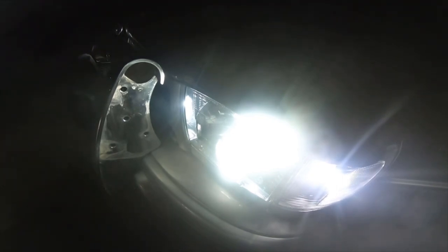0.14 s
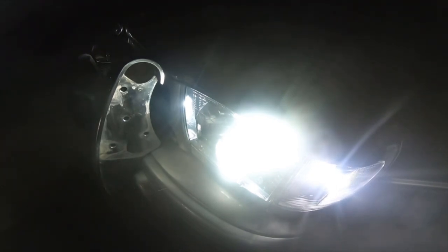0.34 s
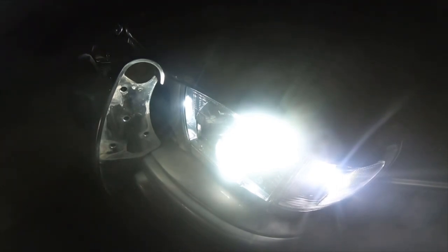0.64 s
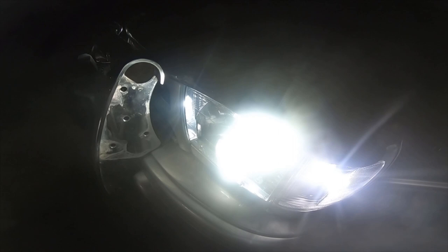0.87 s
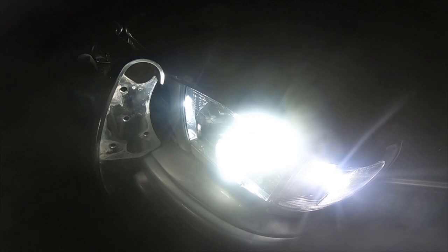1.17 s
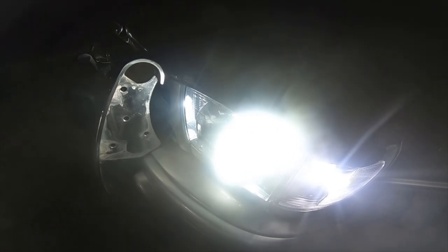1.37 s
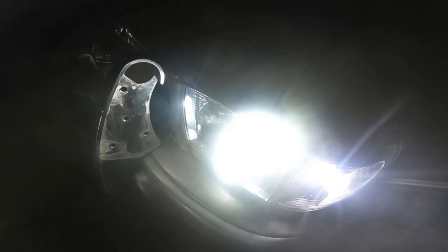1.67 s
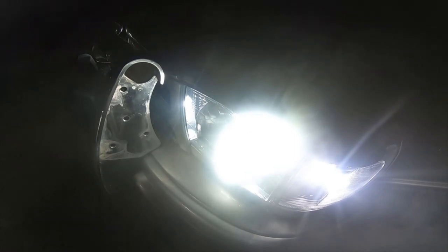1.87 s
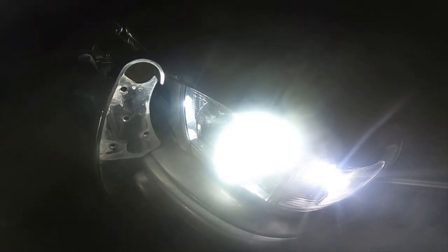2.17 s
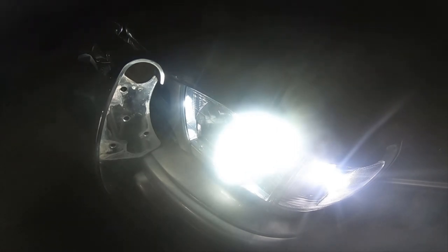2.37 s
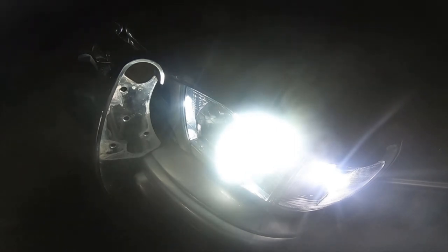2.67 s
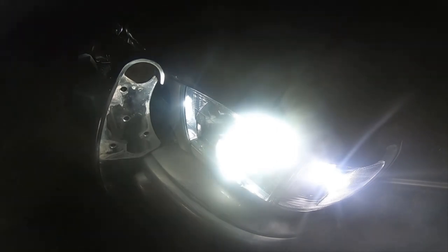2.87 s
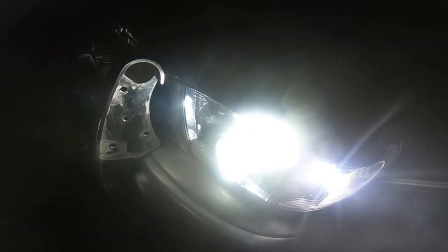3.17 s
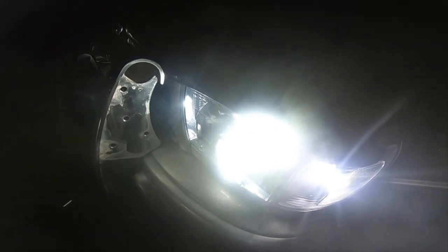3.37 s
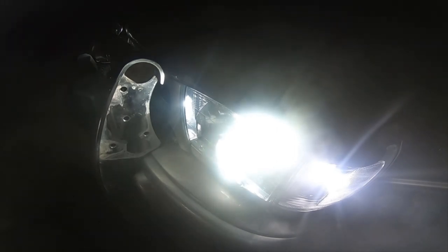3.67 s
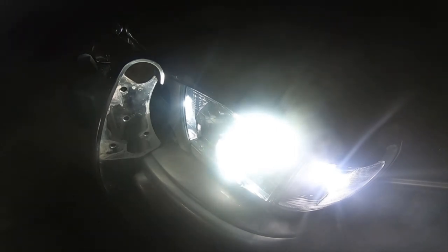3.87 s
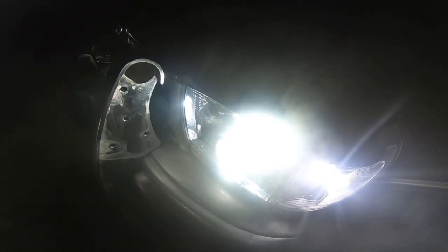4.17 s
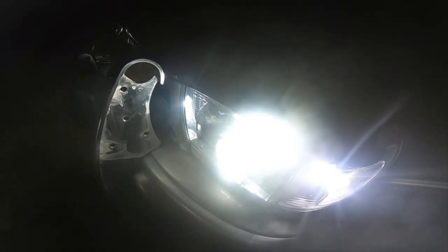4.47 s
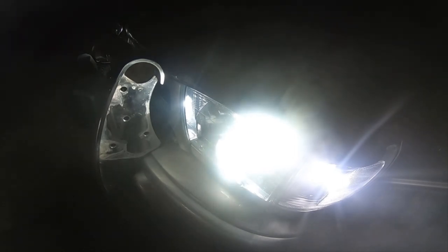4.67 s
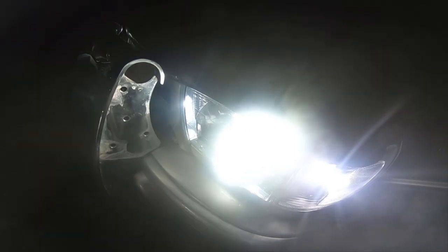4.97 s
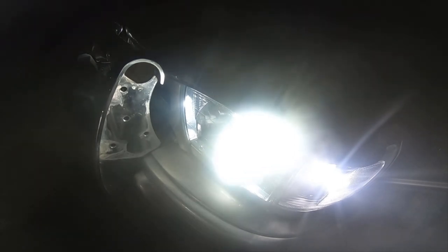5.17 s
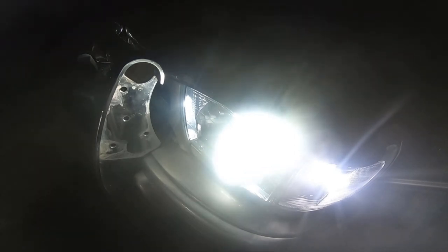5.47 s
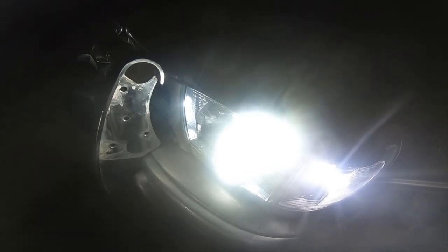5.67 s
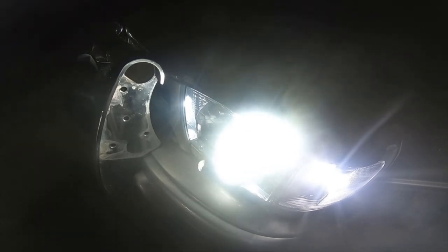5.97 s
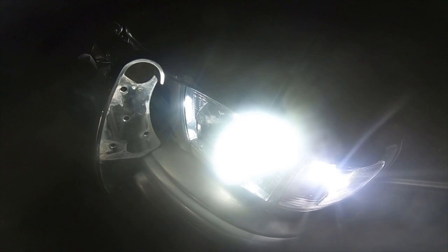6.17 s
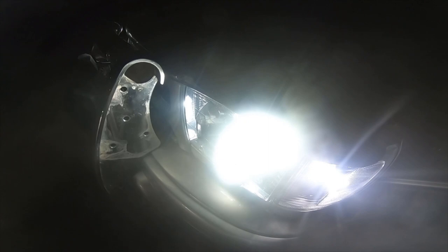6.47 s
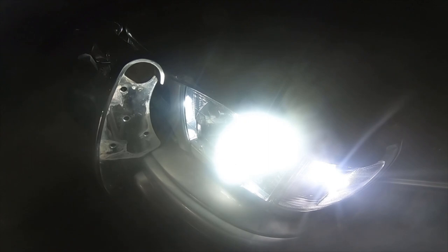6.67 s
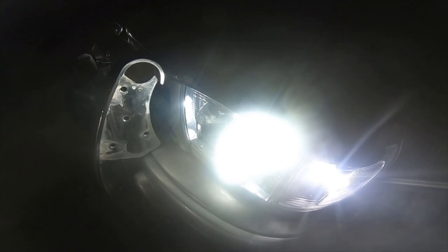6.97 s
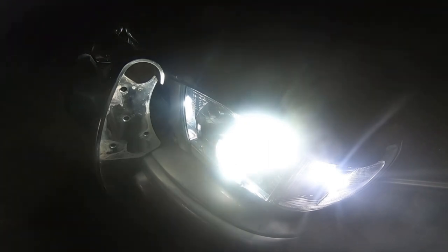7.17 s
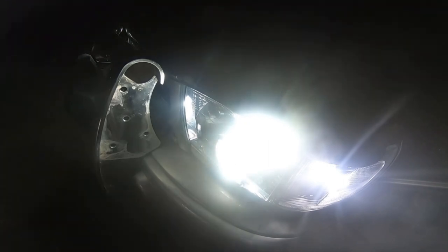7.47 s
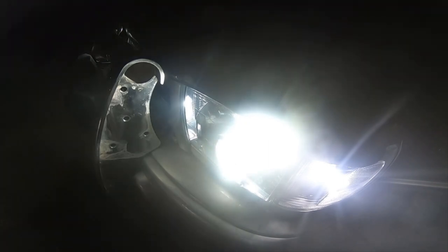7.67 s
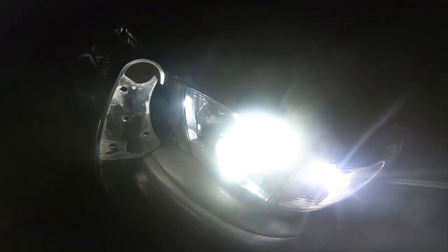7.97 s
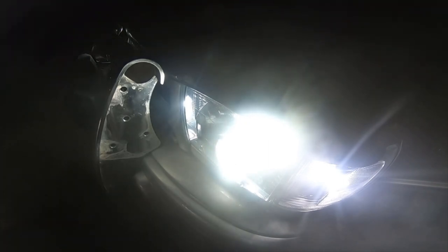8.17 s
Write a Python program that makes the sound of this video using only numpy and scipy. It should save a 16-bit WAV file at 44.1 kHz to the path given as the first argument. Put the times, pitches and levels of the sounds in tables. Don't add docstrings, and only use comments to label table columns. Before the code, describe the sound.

A shoe scuffs and snaps grit faintly during the first second. Then a headlight solenoid close to the microphone flips its metal shutter four times, seconds apart: hard, dry clacks with tight rattling, a brief spring ring and a soft hollow boom. Far-off town traffic rumbles, drones and hisses continuously outdoors at night, gently swelling.

```python
import sys
import numpy as np
from scipy import signal
from scipy.fft import rfft, irfft, next_fast_len
from scipy.io import wavfile
from scipy.ndimage import uniform_filter1d

SR = 44100
rng = np.random.default_rng(int(sys.argv[2]) if len(sys.argv) > 2 else 0)


def file_out(sig):
    cols = np.atleast_2d(sig).T
    lim = np.clip(cols, -1, 1)
    pcm = np.round(lim * 32767).astype(np.int16)
    wavfile.write(sys.argv[1], SR, pcm)


def makeup_ratio(level_db):
    decades = np.asarray(level_db, float) / 20
    return 10 ** decades


N = 367088

# (time [s], level [dB])
FLOW = [(0.0, -46.5), (0.35, -50.5), (1.83, -47), (2.06, -54), (2.32, -46.5), (3.11, -49), (3.59, -47.5),
        (5.26, -51), (5.68, -53.5), (6.28, -45.5), (7.74, -50), (8.32, -51.5)]
# (time [s], level over the flow [dB])
THROBS = [(.11, 0.5), (.42, 9), (.62, 7.5), (.9, 8.5), (1.35, 2), (1.56, 7), (2.04, 7.5), (2.25, 6),
          (2.56, 1), (2.87, 8), (3.1, 6.5), (3.299, 7.5), (3.46, 6.5), (3.74, -1.5), (4.1, 1.5), (4.38, 1),
          (4.88, 11.5), (5.1, 4.5), (5.4, 2.5), (5.53, 5.5), (5.84, 4), (6.03, 4.5), (6.5, -0.5), (6.83, 9),
          (7.0, 5.5), (7.97, 7.5)]
THROB_HALF_S = 0.043
# (share of the flow [dB/dB], share of the throbs [dB/dB])
FOLLOW = [
    (1.0, 1.32),
    (0.63, 0.62),
    (0.46, 0.26),
]
# (frequency [Hz], density [dB per Hz])
WASH = [(20, -19), (42, -11.5), (65, -8), (110, -0.5), (200, -0.5), (330, -13), (700, -13), (1300, -19),
        (2350, -29), (2750, -36.5), (4500, -45), (7500, -53.5), (12400, -56), (12800, -87.5)]
# (frequency [Hz], width [Hz], level over the wash [dB])
HUM = [(273, 130, 2.5), (463.6, 48, 5.5), (542, 40, 3.5), (2190, 250, 3), (3330, 1200, 3),
       (6000, 1660, 5.5)]
# (frequency [Hz], width [Hz], level [dB])
ENGINES = [(54.7, 14, -60.5), (75.2, 8.6, -54), (91.8, 13, -62), (132.5, 8.4, -51.5), (148.8, 16.5, -58.5),
           (174, 8.3, -53.5)]
# (frequency [Hz], left minus right [dB])
FAR_DB = [(60, -3.0), (93, -3.5), (140, -4.0), (220, -4.0), (340, -5.0), (530, -7.0), (820, -2.5),
          (1280, 1.47), (1970, 2.48), (3060, 1.5), (4730, -3.5), (7320, -4.0)]
# (frequency [Hz], left leads by [rad])
FAR_LEAD = [(0, -6.5), (260, 0.5), (690, 1.4), (1030, 2), (1460, 2.0), (1720, 1.76), (1980, 1.5),
            (4050, 0.84), (4910, 0.67), (7490, 4)]
# (frequency [Hz], likeness [0-1])
FAR_SAME = [(30, 0.56), (70, 0.91), (150, 1), (300, 0.74), (600, 0.78), (1200, 0.56), (2500, .55),
            (5000, 0.58), (8000, 0.06)]

# (start [s], drag [s], level [dB])
SCUFFS = [(0, 0.065, -66), (.08, .03, -68), (.15, .26, -71.5), (.42, 0.083, -66), (.492, 0.073, -58.5),
          (.59, .1, -72.5), (.7, .08, -80), (.78, 0.024, -59), (.82, 0.022, -62), (.87, 0.29, -72.5),
          (5.9, 0.047, -74)]
SCUFF_RISE_S, SCUFF_FALL_DB_PER_S = .008, 300
# (frequency [Hz], level [dB])
SCUFF_TONE = [(900, -20), (1800, 3.5), (2800, 1), (4200, -4.5), (5900, 3), (6700, -7), (7300, -17),
              (10000, -46), (13000, -82)]
# (start [s], length [s], level [dB], frequency [Hz])
SQUEAK = (5.912, .05, -79, 4800)
# (time [s], peak level [dB], frequency [Hz], t60 [s])
SNAPS = [(.0488, -44.5, 5700, 0.012), (0.0897, -52, 2640, 0.019), (.1585, -51, 4860, .005),
         (.501, -45, 3530, 0.007), (0.549, -44, 3080, 0.013), (.7874, -60, 5870, 0.006),
         (.7945, -40, 4850, 0.0045), (.7988, -54, 5340, 0.006), (0.8305, -40.5, 5550, 0.0098),
         (1.0954, -50, 2250, 0.015), (1.793, -55, 4520, 0.0079), (3.866, -59, 5770, 0.013)]

# (time of main blow [s], level [dB], air box level [dB])
PULLS = [
    (1.2442, -32, -29),
    (4.7484, -31.5, -29),
]
# (time of main blow [s], level [dB], air box level [dB])
DROPS = [
    (2.6785, -32.5, -28),
    (7.0136, -32, -30),
]
# (time from main blow [s], level [dB], chatter t60 [s], centre [Hz], fall [dB/octave])
PULL_CONTACTS = [(-.027, -24, .1, 5400, 10), (-.0142, -11, .14, 3000, 1.5), (0, -2, .03, 3500, 1),
                 (.0016, -2, .03, 3500, 1), (.0042, -6, .03, 2500, 0), (.0095, -9, .035, 1400, 2),
                 (.018, -13, .06, 3700, 5), (.034, -21, .05, 3300, 5)]
# (time from main blow [s], level [dB], chatter t60 [s], centre [Hz], fall [dB/octave])
DROP_CONTACTS = [(-.0445, -15.5, 0.05, 4300, 10), (-.0395, -16.5, 0.042, 3800, 11),
                 (-.03, -30, .03, 3200, 12), (-.017, -24.5, 0.34, 3000, 5.4), (-.008, -23, .1, 6000, 9.2),
                 (0, 4.5, 0.026, 2200, 1.2), (.0035, 6, 0.029, 5200, 6.6), (.0095, -1, .02, 2300, 4),
                 (0.0156, 0, 0.023, 2580, 2.6), (0.029, -15, 0.054, 3980, 1.1),
                 (0.043, -39, 0.079, 4800, 2.3)]
# (frequency [Hz], level [dB], t60 [s])
PULL_MODES = [(470, -4, .07), (875, -5, .045), (1090, -4, .05), (1724, -4, .04), (2476, -10, .035),
              (2794, -9, .045), (3180, -12, .045), (3400, -8, .04), (3512, -5, .035), (3772, -8, .025),
              (3990, -13, .04), (4447, -17, .04), (5050, -13, .035), (5240, -11, .035), (5610, -12, .03),
              (5860, -13, .04), (6010, -8, .035), (6208, -8, .04), (6404, -10, .035)]
# (frequency [Hz], level [dB], t60 [s])
DROP_MODES = [(505, -4, .06), (1110, -13, .05), (1290, -5, .05), (1712, -5, .035), (1850, -6, .04),
              (1940, -7, .035), (2460, -3, .035), (2600, -8, .04), (3270, -6, .04), (3565, -10, .045),
              (3670, -10, .035), (4090, -12, .035), (4440, -11, .04), (4720, -7, .03), (5085, -10, .035),
              (5330, -2, .035), (5600, -11, .035), (6020, -8, .035), (6240, -12, .04)]
# (frequency [Hz], density [dB per Hz])
PULL_CLATTER = [(200, -16.5), (340, 2.5), (480, 3), (700, -4.5), (1060, -0.5), (1700, -2.5), (2300, -6.5),
                (3450, -4), (4600, -9), (6200, -7), (6900, -16.5), (8300, -26.5), (9100, -32.5),
                (10300, -31), (14500, -73)]
# (frequency [Hz], density [dB per Hz])
DROP_CLATTER = [(200, -12), (340, -2), (510, -3), (680, -3), (1290, -8.5), (1900, -2.5), (2500, -8),
                (3300, -3.5), (4250, -14), (5300, -8.5), (6200, -15.5), (7000, -21.5), (9000, -41),
                (11000, -43.5), (14500, -60)]
# (frequency [Hz], level [dB])
TREBLE_FALL = [(6500, 12.5), (7200, -28.5), (9000, -16.5), (15000, -38)]
# (frequency [Hz], time after blow [s], t60 [s])
SPRING = (3270, .0155, .115)
PULL_SPRING_DB, DROP_SPRING_DB = -16, -8
# (frequency [Hz], rise [s], t60 [s])
BOX = (258, .016, .19)
BLOW_SPREAD_S = .0008
LEAD_IN_S = .06

# (frequency [Hz], left minus right [dB])
NEAR_DB = [(60, -9), (220, -11), (340, -4), (530, -15), (820, -2), (1280, -3), (1970, -4), (3060, 0),
           (4730, -12.5), (7000, -14), (9000, 0.5), (13000, -2)]
# (frequency [Hz], left leads by [rad])
NEAR_LEAD = [(100, 0), (430, -0.2), (860, 1.1), (1550, 2.14), (2070, 1.3), (3450, 0.7), (4740, 0.2),
             (5510, 1.3), (6120, 6), (7490, 3.5), (9000, 8)]


def evened(x):
    return x / np.sqrt(np.mean(x ** 2) + 1e-20)


def read(points, hz):
    f, value = np.transpose(points)
    return np.interp(np.log(hz + 1), np.log(f + 1), value)


def add(mix, s, sound):
    part = mix[round(s * SR):][:len(sound)]
    part += sound[:len(part)]


def coloured(x, db_at):
    log_gain = db_at(abs(np.fft.fftfreq(4096, 1 / SR))) * np.log(10) / 20
    taps = np.fft.ifft(np.exp(np.conj(signal.hilbert(log_gain)))).real[:2048]
    return signal.oaconvolve(x, taps)[:len(x)]


def port_pair(level_db, lead, hz):
    ratio = makeup_ratio(read(level_db, hz)) * np.exp(1j * read(lead, hz))
    return np.array([ratio, np.ones_like(ratio)]) * 2 / np.maximum(abs(1 + ratio), .8)


def swells(t):
    s, db = np.transpose(FLOW)
    flow_db = np.interp(t, s, db)
    throb_db = sum(db * np.exp(-((t - s) / THROB_HALF_S) ** 2) for s, db in THROBS)
    flow_db = flow_db - flow_db.mean()
    throb_db = throb_db - throb_db.mean()
    return [flow * flow_db + throb * throb_db for flow, throb in FOLLOW]


def traffic():
    frames, hz = N // 1024 + 5, np.fft.rfftfreq(4096, 1 / SR)
    a, b, c, d, patches = rng.standard_normal((frames, len(hz), 5)).T
    patches = evened(uniform_filter1d(uniform_filter1d(patches, 40, 0), 4, 1))
    gusts = evened(uniform_filter1d(rng.standard_normal(frames), 3)) * (hz < 320)[:, None]
    hum = sum((makeup_ratio(db) ** 2 - 1) / (1 + (2 * (hz - f) / width) ** 4) for f, width, db in HUM)

    range_of = np.digitize(hz, [110, 320])
    swell_db = np.array(swells(np.arange(frames) * 1024 / SR))[range_of]
    fading = np.clip(read([(2500, 0.37), (5000, .3)], hz), 0, 1)[:, None]
    level_db = read(WASH, hz)[:, None] + fading * swell_db + 1.04 * patches + 1.65 * gusts
    size = makeup_ratio(level_db) * np.sqrt(1 + hum)[:, None]

    same = np.clip(read(FAR_SAME, hz), 0, 1)[:, None]
    first, other = a + 1j * b, c + 1j * d
    ports = np.array([first, same * first + np.sqrt(1 - same ** 2) * other])
    ports *= size * port_pair(FAR_DB, FAR_LEAD, hz)[:, :, None]
    wash = signal.istft(ports, nperseg=4096, noverlap=3072)[1][:, :N]
    return makeup_ratio(-48) * evened(wash)


def drone():
    size = next_fast_len(N)
    hz, t = np.fft.rfftfreq(size, 1 / SR), np.arange(N) / SR
    rumble_db, drone_db, _ = [np.interp(t, t[::256], v) for v in swells(t[::256])]
    out = np.zeros((2, N))
    for f, width, db in ENGINES:
        shared, left, right = rng.standard_normal((3, size))
        band = np.exp(-2 * ((hz - f) / width) ** 2)
        note = evened(irfft(rfft([shared + 0.5 * left, shared + 0.22 * right]) * band, size)[:, :N])
        envelope = abs(signal.hilbert(note[0], size)[:N])
        note = evened(note / np.sqrt(envelope + 0.77))
        swell_db = rumble_db if f < 110 else drone_db
        out += makeup_ratio(db + swell_db) * note
    return out * makeup_ratio([[-2.1], [1.6]])


def drag(start, length, db):
    out, t = np.zeros(N), np.arange(SR // 2) / SR
    fall_db = SCUFF_FALL_DB_PER_S * np.maximum(t - length, 0)
    add(out, start, np.minimum(t / SCUFF_RISE_S, 1) * makeup_ratio(db - fall_db))
    return out


def squeak():
    start, length, db, hz = SQUEAK
    waver = 1 + .1 * uniform_filter1d(rng.standard_normal(N), size=200)
    return drag(start, length, db) * np.sin(2 * np.pi * np.cumsum(hz * waver) / SR)


def shoe():
    strength = makeup_ratio(3.2 * np.minimum(rng.exponential(1, N), 5))
    struck = rng.random(N) < 5000 / SR
    grains = strength * struck * rng.standard_normal(N)
    level = np.sqrt(sum(drag(*row) ** 2 for row in SCUFFS))
    out = level * evened(coloured(grains, lambda hz: read(SCUFF_TONE, hz)))
    out += squeak()
    t = np.arange(1500) / SR
    for s, db, hz, t60 in SNAPS:
        phase = 2 * np.pi * hz * t
        ring = np.sin(phase) + .6 * np.sin(1.15 * phase) + .6 * np.sin(.82 * phase)
        fade = makeup_ratio(db - 60 * t / np.clip(t60, .002, .03))
        add(out, s, fade * np.minimum(t / 0.00057, 1) * ring)
    return out


def air_box(t, box_db):
    hz, rise, t60 = BOX
    after = np.maximum(t, 0)
    phase = 2 * np.pi * hz * after
    boom = np.sin(phase) + .4 * np.sin(1.12 * phase) + .3 * np.sin(.86 * phase)
    return makeup_ratio(box_db - 60 * after / t60) * (1 - np.exp(-(after / rise) ** 2)) * boom


def return_spring(t, chance, spring_db):
    hz, s, t60 = SPRING
    after = np.maximum(t - s, 0)
    phase = 2 * np.pi * hz * after
    rough = 0.34 * evened(uniform_filter1d(chance, size=150))
    fade = makeup_ratio(spring_db - 60 * after / t60) * np.minimum(after / 0.0021, 1)
    return fade * (np.sin(phase) + rough * np.cos(phase))


def shutter_ring(modes):
    lag = np.arange(SR // 4) / SR
    rings = np.zeros(len(lag))
    for k, (hz, db, t60) in enumerate(modes):
        rings += (-1) ** k * makeup_ratio(db - 60 * lag / t60) * np.sin(2 * np.pi * hz * lag)
    return (1 - np.exp(-lag / BLOW_SPREAD_S)) * rings


def stroke(contacts, modes, clatter, chance, spring_db, box_db):
    t = np.arange(len(chance)) / SR - LEAD_IN_S
    ticks, chatter = np.zeros((2, len(t)))
    for s, db, t60, centre_hz, fall_db in contacts:
        def shade(hz):
            return -fall_db * abs(np.log2(np.clip(hz, 300, 7000) / centre_hz))
        after = np.maximum(t - s, 0)
        burst = makeup_ratio(db - 60 * after / t60) * np.minimum(after / 0.00018, 1) * chance
        chatter += coloured(burst, shade)
        if s >= 0:
            tick = np.diff(t >= s, prepend=False)
            ticks += coloured(makeup_ratio(1.7 * db) * tick, shade)
    rung = signal.oaconvolve(ticks, shutter_ring(modes))[:len(t)]
    rung = coloured(rung, lambda hz: read(TREBLE_FALL, hz))
    rattled = coloured(chatter, lambda hz: read(clatter, hz))
    core = (t > 0) & (t < .02)
    metal = rung / rung[core].std() + rattled / rattled[core].std()
    return metal + return_spring(t, chance, spring_db) + air_box(t, box_db)


def solenoid():
    out = np.zeros(N)
    kinds = ((PULLS, PULL_CONTACTS, PULL_MODES, PULL_CLATTER, PULL_SPRING_DB),
             (DROPS, DROP_CONTACTS, DROP_MODES, DROP_CLATTER, DROP_SPRING_DB))
    for events, contacts, modes, clatter, spring_db in kinds:
        habit = rng.standard_normal(SR // 3)
        for s, db, box_db in events:
            chance = .8 * habit + .6 * rng.standard_normal(SR // 3)
            sound = stroke(contacts, modes, clatter, chance, spring_db, box_db - db)
            add(out, s - LEAD_IN_S, makeup_ratio(db) * sound)
    return out


def near(x):
    size = next_fast_len(N)
    ports = port_pair(NEAR_DB, NEAR_LEAD, np.fft.rfftfreq(size, 1 / SR))
    direct = irfft(rfft(x, size) * ports, size)[:, :N]
    t = np.arange(SR // 6) / SR
    signs = rng.choice([-1., 1.], (2, len(t)))
    sparse = rng.random((2, len(t))) < .05
    taps = signs * sparse * makeup_ratio(-60 * t / 0.016) * (t > .002)
    echoes = signal.oaconvolve(direct, taps / np.linalg.norm(taps[0]), axes=1)[:, :N]
    return direct + makeup_ratio(-13) * echoes


def scene():
    return near(solenoid() + shoe()) + traffic() + drone()


def low_pass(x):
    return signal.sosfilt(signal.butter(12, 14300, fs=SR, output="sos"), x)


def record(dry):
    return low_pass(dry)


dry = scene()
out = record(dry)
file_out(out)
```